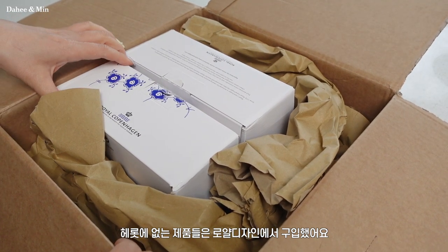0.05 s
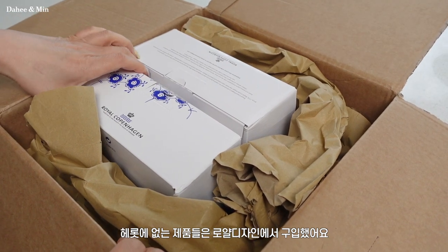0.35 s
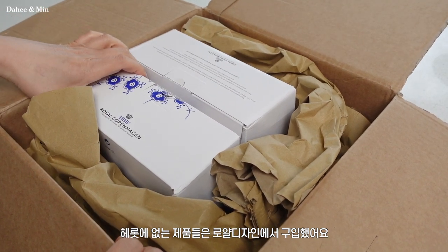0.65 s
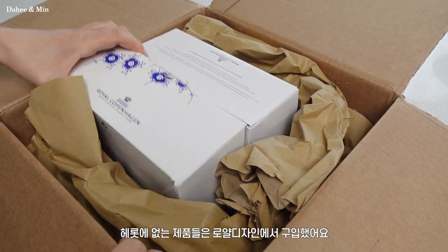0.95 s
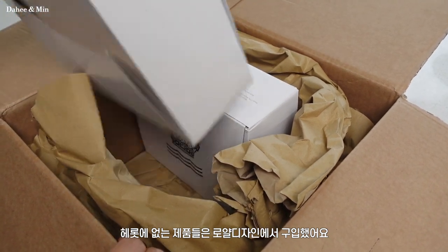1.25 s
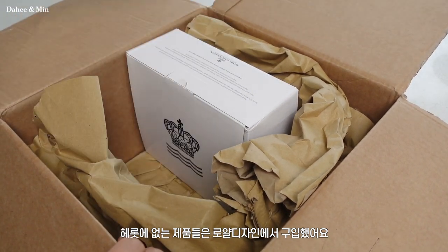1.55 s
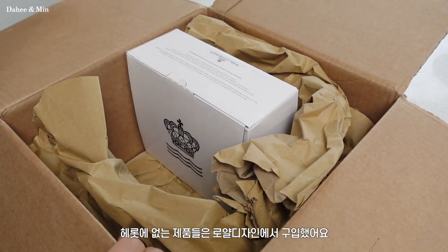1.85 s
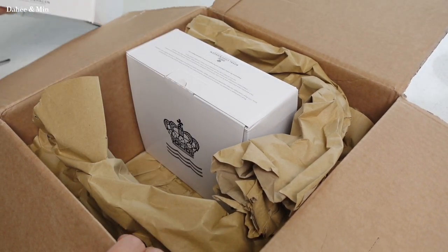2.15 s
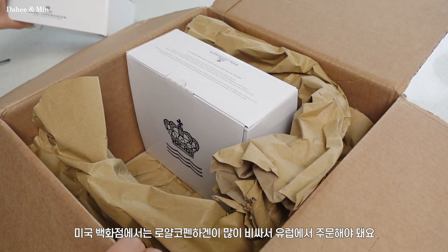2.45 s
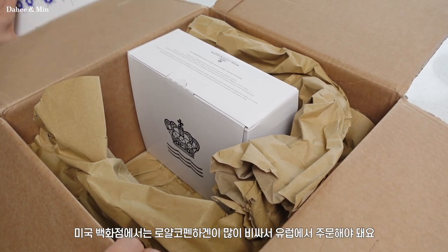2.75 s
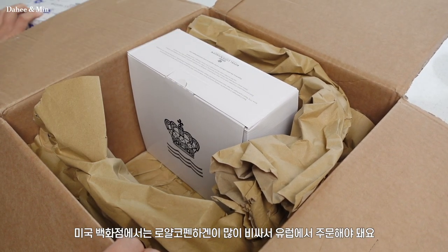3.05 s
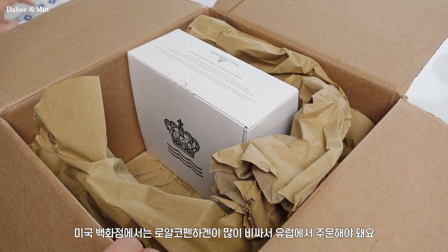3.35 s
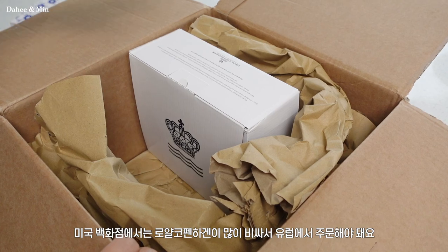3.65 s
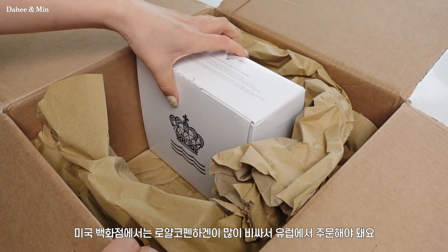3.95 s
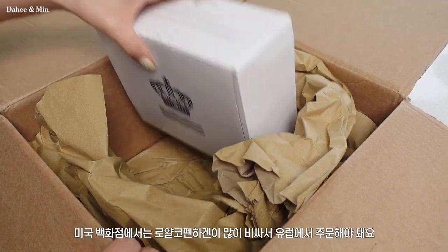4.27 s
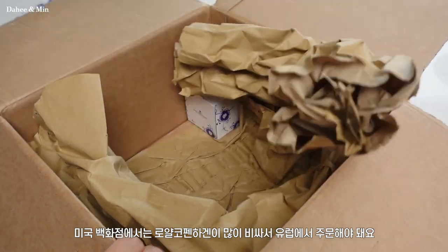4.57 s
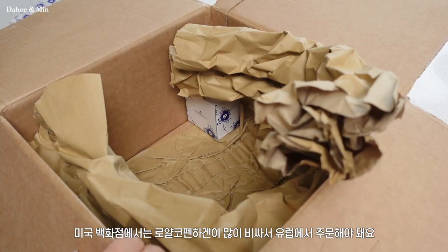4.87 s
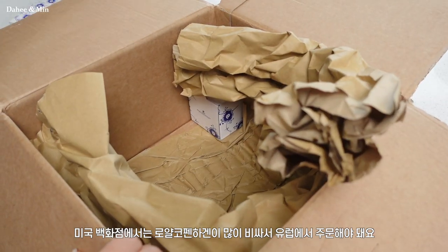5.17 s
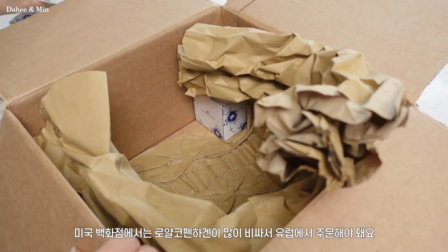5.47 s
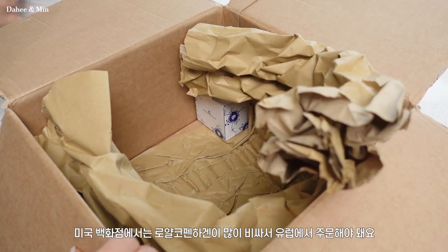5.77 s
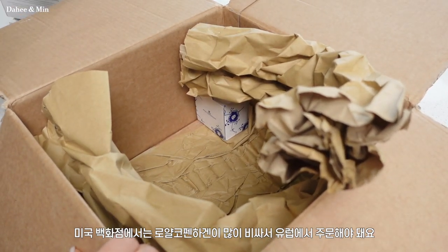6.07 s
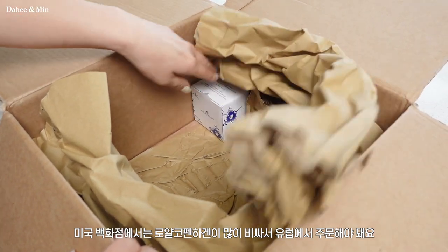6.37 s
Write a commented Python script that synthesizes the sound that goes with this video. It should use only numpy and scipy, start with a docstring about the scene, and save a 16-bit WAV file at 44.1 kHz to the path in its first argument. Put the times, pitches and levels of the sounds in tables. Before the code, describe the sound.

Packing paper rustles and crackles close by from the start, with small sharp crease snaps and a low shudder from the carton around it. At about 0.9 seconds a small cardboard box bumps and slides out along the paper until 1.3. From 2 to 3.5 seconds it is set down on a counter a little further away, with several hollow knocks, light scuffs and a short skid, the firmest knocks near 2.4 and 3.3. The paper crinkles again at 3.9 as a second box bumps free, rising to a loud crunch around 4.3 that fades by 4.7. Softer knocks come at 5.1 and 5.5, then a shove with a short squeak at 5.7. More rustling and snapping runs from 6.2 to 6.5. The sound is nearly mono, with a short kitchen echo over soft air and a faint appliance hum.

```python
"""A live kitchen, heard nearly in mono: two small cardboard boxes are pulled out of a carton lined with
crumpled packing paper. Creases buckle and snap, paper and card rub in countless tiny slips, and the
carton rumbles underneath. Each box is set down on the counter with a few hollow knocks and scuffs,
the second with a short squeak. The room rings on over a bed of soft air and faint appliance hum."""
import sys
import numpy as np
from scipy import signal
from scipy.fft import rfft, irfft
from scipy.io import wavfile

SR = 44100
rng = np.random.default_rng(int(sys.argv[2]) if len(sys.argv) > 2 else 0)


def wav_record(signal):
    """Record a signal, one row per channel, as 16-bit PCM in the file named by sys.argv[1]."""
    frames = np.transpose(np.atleast_2d(signal))
    bounded = np.clip(frames, -1, 1)
    # unit amplitude maps onto the largest positive 16-bit level
    quanta = np.round(bounded * 32767).astype(np.int16)
    wavfile.write(sys.argv[1], SR, quanta)


N = 287532
TIME = np.arange(N) / SR

# EQ curves for the room's air, its echo, the bounce off the carton wall and the stereo side signal.
# Each row: frequency in Hz, gain in dB.
AIR_EQ = [(15, -81.5), (25, -67), (114, -8.5), (175, -13.5), (236, -6), (285, -18.5), (317, -15),
          (607, -21), (818, -19), (1440, -25.5), (1650, -20), (2760, -34), (10700, -46), (14400, -42),
          (16000, -52.5)]
ECHO_EQ = [(100, 12.5), (400, -0.5), (1000, 2.5), (2000, 3.5), (4000, 0.5), (8000, 3.5), (15000, -4)]
CARTON_WALL_EQ = [(100, 6), (4000, -2), (8000, -3.5), (14000, -22.5)]
SIDE_EQ = [(25, -21), (100, -28.5), (500, -15.5), (2000, -15), (5000, -21), (10000, -31.5), (15000, -38)]
# The appliance hum. Each row: frequency in Hz, rms level in dB.
HUM_TONES = [(143, -79), (247, -73)]
# How long the kitchen rings. Each row: frequency in Hz, time to fall 60 dB in seconds.
ECHO_DECAY = [(150, 0.38), (400, 0.6849), (1000, 0.8), (2000, 0.6946), (4000, 0.73), (8000, 0.54),
              (15000, 0.97)]

# The tone of each contact. Each row: frequency in Hz, relative gain in dB.
RUMBLE_EQ = [(30, -30.5), (60, -16), (95, -3), (200, -1.5), (350, 5), (700, -30), (2000, -73)]  # the big carton shaking
RUSTLE_EQ = [(60, -29.5), (120, -20.5), (330, 0.5), (600, -1.5), (1130, 4), (2300, 0), (4100, -5),
             (8100, -14), (12400, -20), (16000, -30.5)]  # paper pushed aside
DRAG_EQ = [(59, -40.5), (100, 1), (170, -17.5), (202, -10), (271, -8.5), (398, -0.5), (595, -7.5),
           (752, -1), (818, -1), (1520, 0.5), (4470, -1.5), (12100, -16.5), (16000, -27)]  # the paper wad hauled up and springing back
SLIDE_EQ = [(60, -22), (110, -4), (250, -15), (380, 3), (600, -6), (850, -5), (1150, -0.5), (2000, -4),
            (3500, -5.5), (5400, -4.5), (6300, -4), (7300, -14), (8700, -10.5), (10500, -18.5),
            (16000, -26.5)]  # a box drawn out along the paper
GRAZE_EQ = [(100, -30), (1000, 0), (2250, -6), (3000, -8), (4100, -10), (4700, -0.5), (5400, -10),
            (8500, -17), (11000, -22), (15000, -28)]  # fingers on the carried box
SCUFF_EQ = [(120, -21), (300, 10), (700, 1), (1700, 4), (3000, -4), (5500, -2.5), (8000, -10), (15000, -19)]  # a box brushing the counter
SKID_EQ = [(40, -61), (90, -21), (170, -2.5), (500, 1.5), (900, -2), (1300, -7.5), (1950, 0), (2500, -11),
           (4500, -13.5), (8000, -26.5), (15000, -40.5)]  # a box pushed along on its edge
SHOVE_EQ = [(40, -48), (120, -26), (200, -15), (265, 8), (380, -14), (520, -1), (700, -13.5), (1200, -13.5),
            (2200, -13.5), (3000, -17), (6000, -22), (9000, -34), (15000, -37)]  # a box pushed along on its base
CLICK_EQ = [(40, -44), (150, -9), (600, 6.5), (1900, -4), (3000, -10), (5000, -10.5), (9000, -21.5),
            (15000, -25.5)]  # a box edge landing
SNAP_EQ = [(60, -38.5), (250, 3.5), (600, -2), (2000, 2.5), (5000, 0), (9000, -7.5), (15000, -18.5)]  # a crease flipping

# The rubbing cues. Each row: start in seconds, length in seconds, relative level in dB,
# swell from start to end in dB, brightness in dB, name of the contact.
STROKES = [(0.0, 0.043, -50.5, -6, 1.5, "rustle"), (0.09, 0.16, -46.5, 2.5, -2, "rustle"),
           (0.277, 0.12, -41, 9, 0, "rustle"), (0.703, 0.084, -46, 1, -13, "rustle"),
           (0.927, 0.068, -37, 7, -6.5, "slide"), (1.001, .13, -41, 0, 6.5, "slide"),
           (1.129, .14, -40, -3.5, 5.5, "slide"), (1.283, 0.039, -46, 2, -2, "slide"),
           (2.12, 0.51, -59.5, 0, -4, "graze"), (2.68, 0.16, -55.5, 9, 5.5, "scuff"),
           (2.887, 0.44, -59.5, -12, -10, "scuff"), (3.186, 0.068, -53.5, 3, 11.5, "skid"),
           (3.275, .11, -37, -2.5, -7, "skid"), (3.458, .008, -46.5, 9, 2, "skid"),
           (3.863, 0.077, -46, 0, -4.5, "rustle"), (3.941, 0.038, -38.5, -0.5, 0, "rustle"),
           (3.992, .1, -45.5, 8, 2.5, "rustle"), (4.097, 0.031, -39, 3.5, 4, "rustle"),
           (4.14, 0.21, -48.5, -6.5, -7.5, "rustle"), (4.266, 0.041, -27.5, 9, -5.5, "drag"),
           (4.309, 0.068, -24, -8, 1, "drag"), (4.426, 0.102, -38, -4.5, 0, "drag"),
           (4.549, 0.027, -38, -5, 8, "drag"), (4.581, 0.073, -36, 2.5, -8, "drag"),
           (4.665, 0.035, -43, 7, -14, "drag"), (5.672, 0.082, -38.5, 6, -5, "shove"),
           (5.779, 0.095, -56.5, 3, 6.5, "shove"), (6.236, .085, -60, 8, 9, "rustle"),
           (6.335, 0.1, -40.5, 1, 9.5, "rustle"), (6.443, 0.015, -31, 2.5, 2.5, "rustle"),
           (6.488, .05, -43, 8, 6, "rustle")]
# A small box's panel modes. Each row: frequency in Hz, relative level in dB, 60 dB decay in seconds.
PANEL_MODES = [(146, -17.5, 0.099), (250, -18.5, 0.28), (341, -15.5, 0.14), (401.6, -15.5, 0.14),
               (491, -15, 0.14), (599, -24.5, 0.15), (783, -26, 0.17), (947, -25, 0.23), (2270, -22, 0.044)]
# Boxes hitting the carton and the counter. Each row: start in seconds, thud level in dB, thud pitch
# in Hz, relative click level in dB, click lift at 5 kHz in dB, ring trim in dB.
BOX_HITS = [(0.927, -31.5, 297, -34, 0, 8), (1.994, -33.5, 296, -39, -4.5, 8),
            (2.096, -28.5, 400, -37.5, -7, 10.5), (2.154, -29.5, 445, -39.5, -4, 11.5),
            (2.418, -17, 491, -37, -8.5, 3), (2.682, -20.5, 447, -33, -2.5, 6.5),
            (3.198, -29, 346, -47, -1, 11), (3.297, -14, 1770, -25.5, -9.5, -6.5),
            (3.300, -19.5, 435, -40, 2, 1.5), (4.125, -26.5, 389.3, -38, -5, -3),
            (4.220, -29, 260, -35.5, -2, -3), (4.302, -23, 712, -33, 15, 5),
            (5.059, -30.5, 394, -38, 4, 10), (5.512, -27.5, 296, -39, -4, 12),
            (5.702, -40, 287, -45, 5, 13)]
# The featured crease snaps. Each row: start in seconds, relative level in dB, tone centre in Hz,
# treble shelf in dB.
LOUD_CREASES = [(0.085, -26.5, 3160, 8), (0.106, -26, 2020, 10), (0.124, -23, 2490, 19),
                (0.155, -25, 4240, 5), (0.2, -24, 1070, 7), (0.23, -17.5, 1450, -4),
                (0.269, -14.5, 2920, -18.5), (0.286, -10.5, 2490, -8.5), (0.37, -9, 1060, -1),
                (0.381, -13, 1750, 21), (0.392, -17, 4270, 5), (0.401, -16.5, 2100, 5),
                (0.571, -14.5, 640, 15.5), (0.737, -29.5, 1750, 22), (0.757, -30, 2000, -4),
                (0.81, -19, 654, 17), (0.897, -18, 1090, 10), (1.146, -14.5, 2240, -8),
                (1.155, -14, 1190, 0), (1.239, -21, 1140, -23), (1.268, -21, 3720, 19),
                (1.835, -39, 2430, 3), (2.806, -20.5, 505, -12), (2.812, -22.5, 570, -5),
                (3.857, -22.5, 1730, -8.5), (3.869, -15, 2030, -12.5), (3.988, -21, 2510, 15),
                (4.083, -11, 2570, 10), (4.348, -11, 3330, 3), (4.392, -8.5, 4250, -1),
                (4.4, -9, 2120, 6.5), (5.846, -29, 1850, -4), (6.241, -26, 1320, -25.5),
                (6.332, -18, 1676, 6), (6.424, -15.5, 1360, -29), (6.456, -17, 3400, -10)]


def gain_of(db):
    """Decibels to amplitude."""
    return 10 ** (np.asarray(db) / 20)


def unit_rms(x):
    """Scales to rms 1."""
    return x / np.sqrt(np.mean(x ** 2) + 1e-20)


def curve_at(points, hz):
    """Reads a curve on a log-frequency axis."""
    f, value = np.transpose(points)
    return np.interp(np.log(hz + 1), np.log(f + 1), value)


def add(mix, start, sound):
    """Mixes a sound in at start seconds."""
    part = mix[max(round(start * SR), 0):][:len(sound)]
    part += sound[:len(part)]


def pulse(db_at, size=2048):
    """The sharpest causal pulse of unit energy whose spectrum follows db_at(Hz)."""
    log_gain = np.log(gain_of(db_at(abs(np.fft.fftfreq(size, 1 / SR)))))
    wave = np.fft.ifft(np.exp(np.conj(signal.hilbert(log_gain)))).real[:size // 2]
    return wave / np.linalg.norm(wave)


def equalise(x, eq):
    """Applies an EQ curve with no pre-ring on the attacks."""
    return signal.oaconvolve(x, pulse(lambda hz: curve_at(eq, hz), size=8192))[:len(x)]


def wander(per_s):
    """A random modulator of rms 1, gliding to per_s new values a second."""
    return unit_rms(np.interp(TIME * per_s, np.arange(N), rng.standard_normal(N)))


def room_tone():
    """The bed: steady air noise with a wavering appliance hum."""
    air = gain_of(-60) * unit_rms(equalise(rng.standard_normal(N), AIR_EQ))
    hum = np.zeros(N)
    for hz, db in HUM_TONES:
        waver = 1 + 0.38 * wander(6.4)
        hum += gain_of(db) * waver * np.sqrt(2) * np.sin(2 * np.pi * hz * TIME + wander(10))
    return air + hum


def kitchen_echo(send, build_s=0.0077):
    """A diffuse reverb that builds up quickly, each band dying at its own speed."""
    hz, t, bands = signal.stft(rng.standard_normal(SR), SR, nperseg=256)
    bands *= gain_of(curve_at(ECHO_EQ, hz)[:, None] - 60 * t / curve_at(ECHO_DECAY, hz)[:, None])
    build = 1 - np.exp(-(TIME[:SR] / build_s) ** 2)
    tail = signal.istft(bands, SR, nperseg=256)[1][:SR] * build
    return signal.fftconvolve(send, tail / np.sqrt(SR / 20))[:N]


def carton_rumble(push, haul, draw, jerk_s=0.0083):
    """The big carton shudders under the rubbing, most when a sliding box first breaks free."""
    pole = np.exp(-1 / (jerk_s * SR))
    jerk = np.maximum(draw - signal.lfilter([1 - pole], [1, -pole], draw), 0)
    force = gain_of(-11) * push + gain_of(-20) * haul + gain_of(-14) * draw + gain_of(-1) * jerk
    return force * unit_rms(equalise(rng.standard_normal(N), RUMBLE_EQ))


def card_squeak(start=5.705, length_s=0.063, hz=3450, width_hz=400, db=-47):
    """Card sticks and slips on the counter around one fuzzy pitch."""
    phase = 2 * np.pi * hz * TIME
    tone = wander(width_hz) * np.cos(phase) + wander(width_hz) * np.sin(phase)
    progress = np.clip((TIME - start) / length_s, 0, 1)
    return gain_of(db) * tone * np.sqrt(abs(np.sin(np.pi * progress)))


def flutter(noise, t60, tail_db, tail_t60, rise_s):
    """A jolted sheet rattles: a burst a few milliseconds long, with a weaker, longer tail."""
    t = np.arange(len(noise)) / SR
    swell = 1 - np.exp(-(t / rise_s) ** 2)
    return noise * swell * (gain_of(-60 * t / t60) + gain_of(tail_db - 60 * t / tail_t60))


def strokes(contact, attack_s, release_s):
    """Level and treble envelopes of one contact: each stroke takes hold, swells or eases, lets go."""
    power, treble = np.full(N, 1e-20), np.zeros(N)
    for start, length, db, swell_db, bright_db, kind in STROKES:
        if kind == contact:
            t = TIME - start
            held = gain_of(db + swell_db * (np.clip(t / length, 0, 1) - 0.5))
            attack = np.clip(t / attack_s, 0, 1)
            release = np.exp(-np.clip((t - length) / release_s, 0, 20))
            stroke_power = (held * attack * release) ** 2
            power += stroke_power
            treble += stroke_power * gain_of(bright_db)
    return np.sqrt(power), treble / power


def friction(envelopes, eq, slips_per_s, spread_db, hiss_db, clump_db, clumps_per_s, db):
    """Countless tiny slips of uneven size, coming in clumps over a smooth hiss."""
    level, treble = envelopes
    sizes = gain_of(spread_db * np.minimum(rng.exponential(1, N), 3.5))
    slips = sizes * (rng.random(N) < slips_per_s / SR)
    one_slip = flutter(np.ones(500), t60=0.0028, tail_db=-14.5, tail_t60=0.012, rise_s=0.00029)
    power = abs(signal.oaconvolve(slips ** 2, one_slip ** 2)[:N])
    grit = np.sqrt(power / power.mean() + gain_of(hiss_db) ** 2) * rng.standard_normal(N)
    rub = unit_rms(equalise(grit * gain_of(clump_db * wander(clumps_per_s)), eq))
    # faster rubbing lifts the treble
    dull = signal.sosfiltfilt(signal.butter(1, 3500, fs=SR, output="sos"), rub)
    return gain_of(db) * level * (dull + treble * (rub - dull))


def box_scrapes():
    """Fingers graze the carried box; card scuffs, skids and is shoved over the counter."""
    graze = friction(strokes("graze", attack_s=0.077, release_s=0.043), GRAZE_EQ, slips_per_s=820,
                     spread_db=3, hiss_db=1, clump_db=4.5, clumps_per_s=51, db=-0.5)
    scuff = friction(strokes("scuff", attack_s=0.014, release_s=0.032), SCUFF_EQ, slips_per_s=460,
                     spread_db=0.5, hiss_db=-3.5, clump_db=5, clumps_per_s=70, db=2.5)
    skid = friction(strokes("skid", attack_s=0.007, release_s=0.0098), SKID_EQ, slips_per_s=580,
                    spread_db=0.5, hiss_db=-6, clump_db=3, clumps_per_s=97, db=0.5)
    shove = friction(strokes("shove", attack_s=0.0096, release_s=0.008), SHOVE_EQ, slips_per_s=610,
                     spread_db=5, hiss_db=-3, clump_db=-1, clumps_per_s=87, db=2)
    return graze + scuff + skid + shove


def thud(t, pitch_hz, rise_cycles=1.39, sag=0.49):
    """High bending waves cross the card fastest, so a thud falls in pitch as it swells and dies."""
    age = t * pitch_hz / rise_cycles
    turns = np.cumsum(pitch_hz * np.exp(sag * (1 - np.minimum(age, 2)))) / SR
    return (age * np.exp(1 - age)) ** 4 * np.sin(2 * np.pi * turns)


def panel_ring(t, pitch_hz, detunes, rise_cycles=1.39):
    """A blow feeds the panel modes nearest its own pitch; the grip detunes them a little."""
    ring = np.zeros(len(t))
    for (hz, db, t60), detune in zip(PANEL_MODES, detunes):
        octaves_off = abs(np.log2(hz / pitch_hz))
        decay = gain_of(db - 4.5 * octaves_off - 60 * t / t60)
        ring += decay * np.sin(2 * np.pi * hz * (1 + 0.027 * detune) * t)
    return ring * np.tanh(t * pitch_hz / rise_cycles)


def box_knocks(settle_s=0.01492, settle_db=-41, settle_pitch_ratio=0.8):
    """A box lands: its edge clicks, its face thuds, its panels ring, then its weight drops it flat."""
    out, t = np.zeros(N), np.arange(9000) / SR
    for start, db, pitch_hz, click_db, treble_db, ring_db in BOX_HITS:
        noise = rng.standard_normal(len(t))
        ring = gain_of(ring_db - 4) * panel_ring(t, pitch_hz, detunes=noise[::-1])
        edge = pulse(lambda hz: curve_at(CLICK_EQ, hz) + treble_db * 2 * hz / (hz + 5000))
        rattle = flutter(np.sign(noise), t60=0.018, tail_db=-5.5, tail_t60=0.081, rise_s=0.00073)
        click = signal.fftconvolve(rattle, edge)
        add(out, start, gain_of(db) * (thud(t, pitch_hz) + ring))
        add(out, start, 6 * gain_of(click_db + 9) * click / np.linalg.norm(click))
        add(out, start + settle_s, gain_of(settle_db) * thud(t, settle_pitch_ratio * pitch_hz))
    return out


def lesser_creases(push, per_s=40, spread_db=2, mid_hz=2200, spread_octaves=0.8):
    """Cues for small creases giving way at random; the harder the paper is pushed, the louder."""
    gap, softness, height = rng.random((600, 3)).T
    starts = np.cumsum(-np.log(1 - gap)) / per_s
    push_db = 20 * np.log10(np.interp(starts, TIME, push, right=1e-10))
    levels = push_db + 13.5 - spread_db * (2 * softness - 1)
    centres = mid_hz * 2 ** (spread_octaves * (2 * height - 1))
    return [(start, db, hz, 0) for start, db, hz in zip(starts, levels, centres) if db > -50]


def crease_snaps(push, lead_in_db=-14, lead_in_s=0.0015, buckle=1.63):
    """Each crease buckles and rattles the paper facet around it; small facets sound higher."""
    out, t_before = np.zeros(N), np.arange(-400, 0) / SR
    noises = rng.standard_normal((200, 2400))
    creases = list(LOUD_CREASES) + lesser_creases(push)
    for (start, db, centre_hz, treble_db), noise in zip(creases, noises):
        facet = pulse(lambda hz: curve_at(SNAP_EQ, hz)
                      - 6 * np.log1p(np.log2((hz + 30) / centre_hz) ** 2)  # broad peak at the centre
                      + treble_db * hz / (hz + 5000))
        rattle = flutter(np.sign(noise), t60=0.0086, tail_db=-19, tail_t60=0.09, rise_s=0.00072)
        rattle[20] += buckle  # the crease flips in one go
        # a faint, very short swell of noise leads into each snap
        lead_in_noise = gain_of(lead_in_db) * np.exp(t_before / lead_in_s) * noise[-len(t_before):]
        snap = signal.fftconvolve(np.concatenate([lead_in_noise, rattle]), facet)
        add(out, start + t_before[0], 5 * gain_of(db - 2) * snap / np.linalg.norm(snap))
    return out


def scene():
    """The mix: paper close up, partly shielded by the carton; the counter further off and wetter."""
    push = strokes("rustle", attack_s=0.0073, release_s=0.015)
    haul = strokes("drag", attack_s=0.009, release_s=0.012)
    draw = strokes("slide", attack_s=0.011, release_s=0.014)
    rustle = friction(push, RUSTLE_EQ, slips_per_s=500,
                      spread_db=4, hiss_db=0.5, clump_db=1.5, clumps_per_s=92, db=1.3)
    drag = friction(haul, DRAG_EQ, slips_per_s=2100,
                    spread_db=3.5, hiss_db=-6.5, clump_db=-0.15, clumps_per_s=170, db=-0.04)
    slide = friction(draw, SLIDE_EQ, slips_per_s=2800,
                     spread_db=3.5, hiss_db=0, clump_db=1.36, clumps_per_s=80, db=1.2)
    scrapes = box_scrapes()
    paper = rustle + drag + carton_rumble(push[0], haul[0], draw[0])  # [0] is the level envelope
    squeak, creases, knocks = card_squeak(), crease_snaps(push[0]), box_knocks()
    send = (gain_of(-10.5) * paper + gain_of(-10) * creases + gain_of(-24) * slide
            + gain_of(-5) * scrapes + gain_of(-4) * knocks + gain_of(-7) * squeak)
    in_carton = paper + creases + slide
    mid = in_carton + scrapes + squeak + knocks + kitchen_echo(send) + room_tone()
    width = gain_of(curve_at(SIDE_EQ, np.fft.rfftfreq(N, 1 / SR)))
    side = irfft(width * rfft(kitchen_echo(send) + gain_of(8.5) * room_tone()), N)
    # a bounce off the carton's wall reaches the two microphones unequally
    add(side, 0.0012, gain_of(-36.5) * equalise(in_carton, CARTON_WALL_EQ))
    return np.array([mid + side, mid - side]) * gain_of([[-0.15], [0.15]])


def record(dry):
    """The microphone's bass roll-off and the recorder's band limit."""
    thin = signal.sosfilt(signal.butter(2, 55, "highpass", fs=SR, output="sos"), dry)
    high_cut = signal.firwin(511, 16050, window=("kaiser", 9), fs=SR)
    return signal.oaconvolve(thin, high_cut[None], "same")


dry = scene()
out = record(dry)
wav_record(out)
```